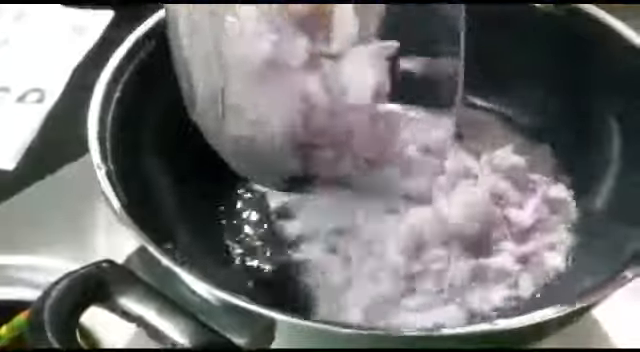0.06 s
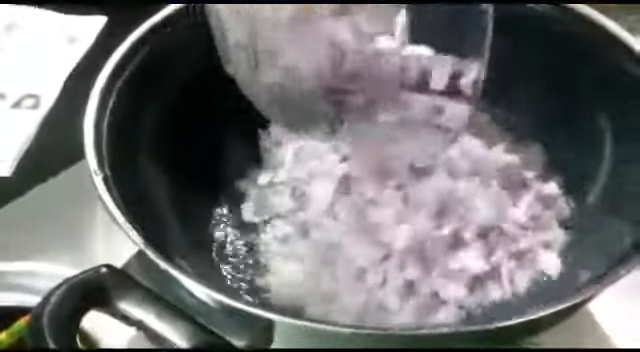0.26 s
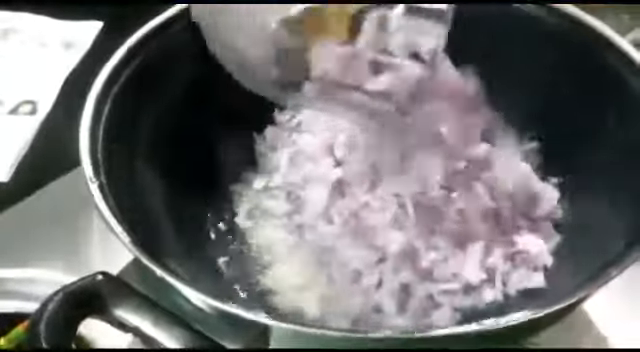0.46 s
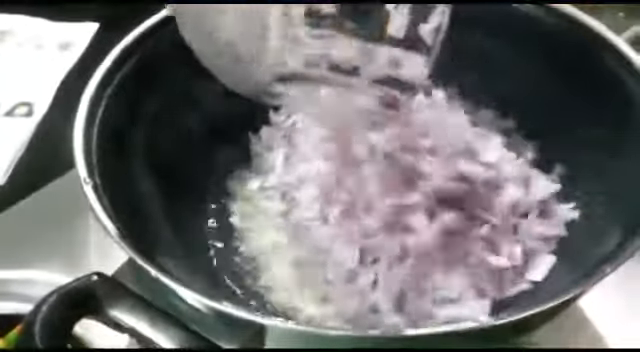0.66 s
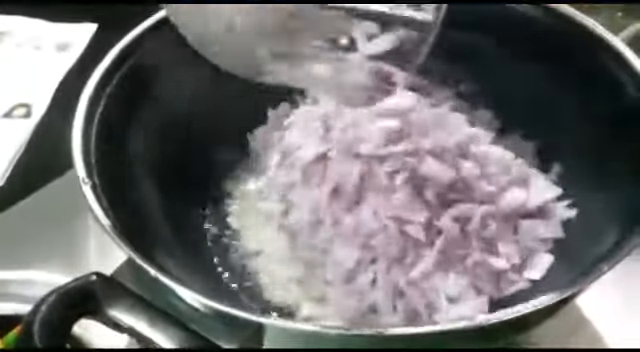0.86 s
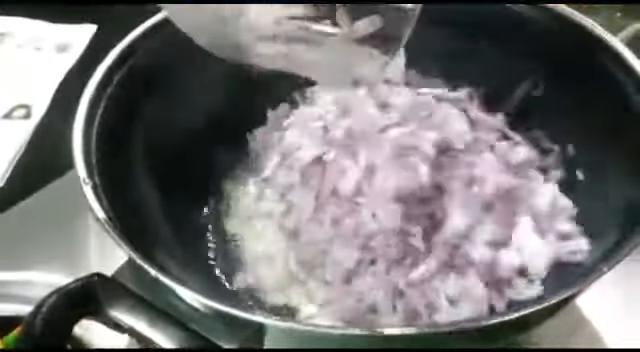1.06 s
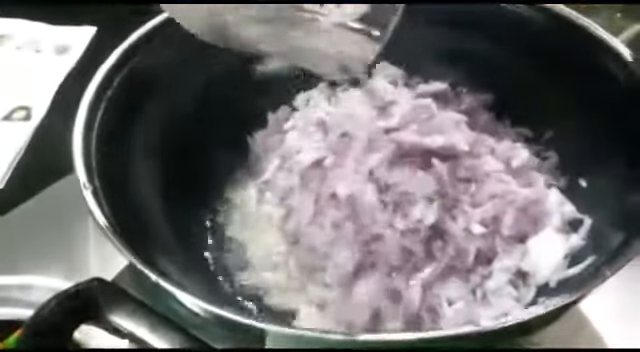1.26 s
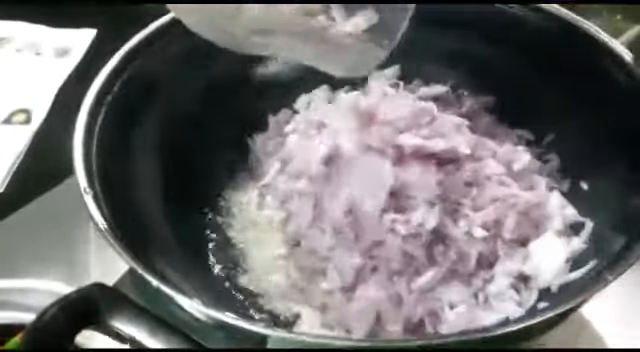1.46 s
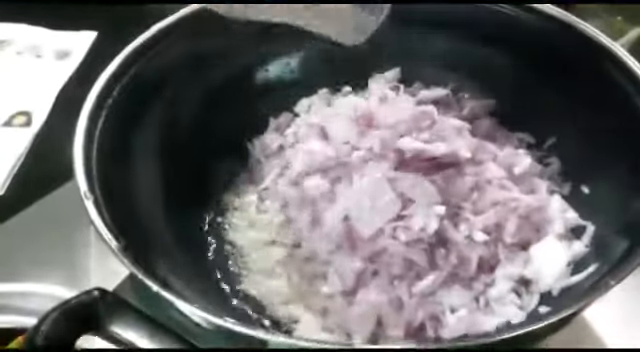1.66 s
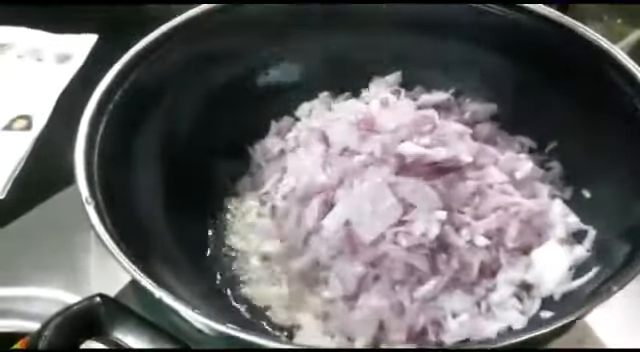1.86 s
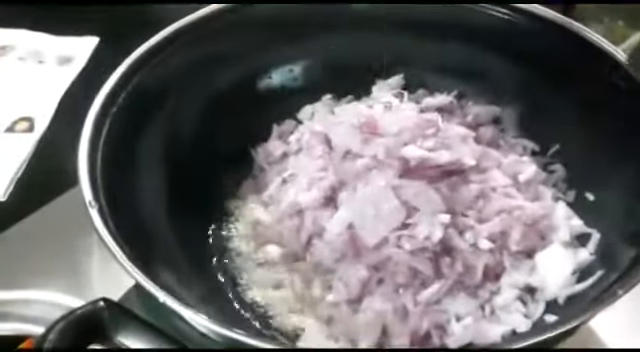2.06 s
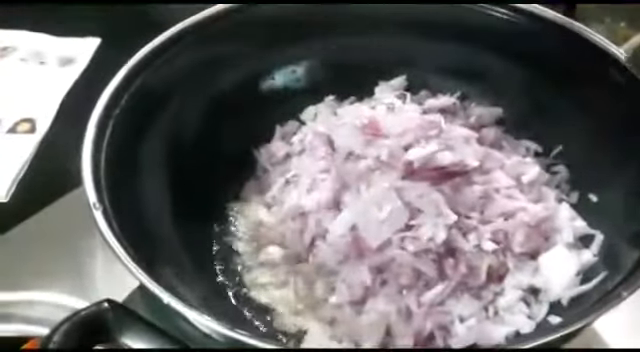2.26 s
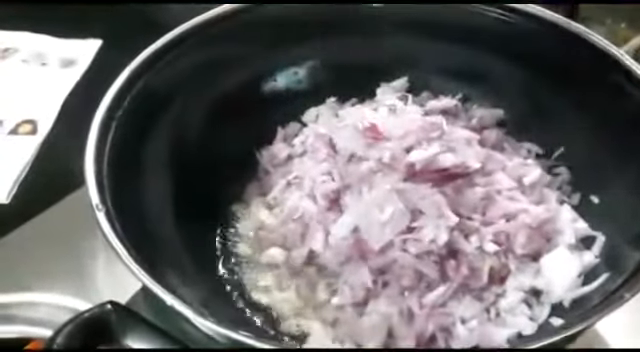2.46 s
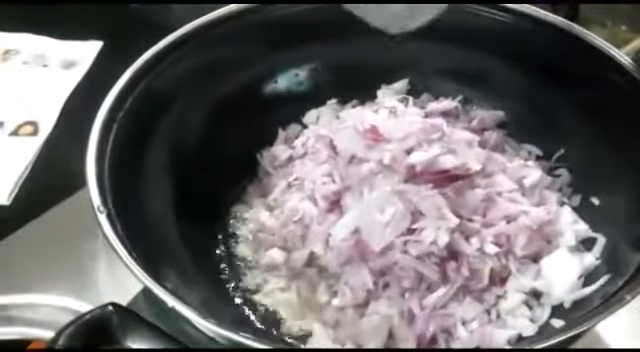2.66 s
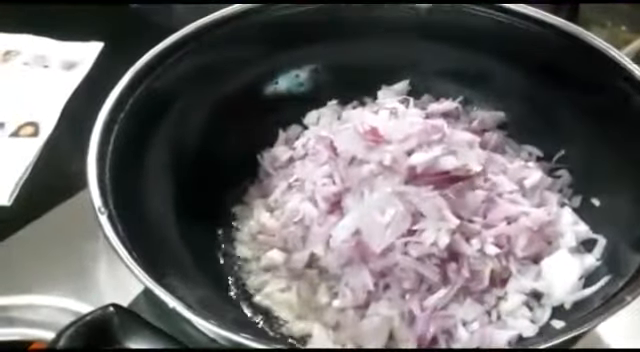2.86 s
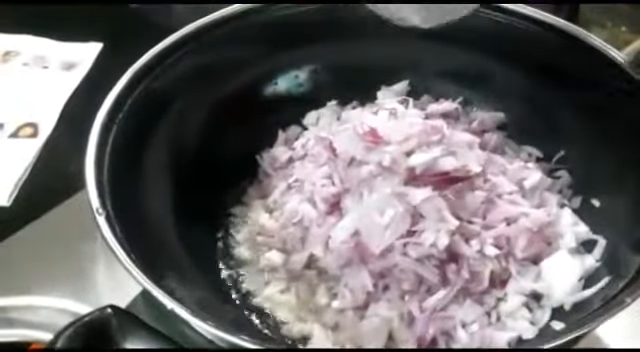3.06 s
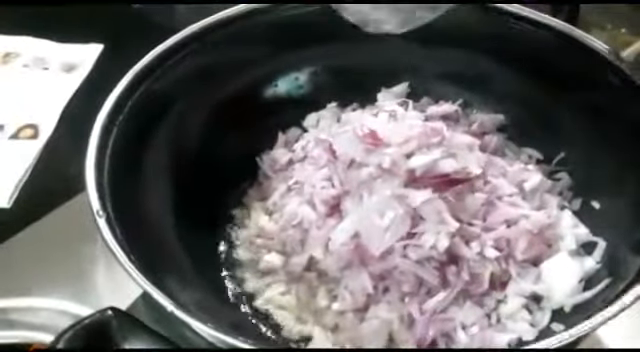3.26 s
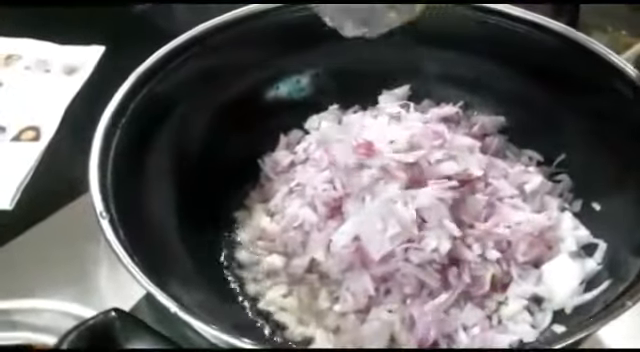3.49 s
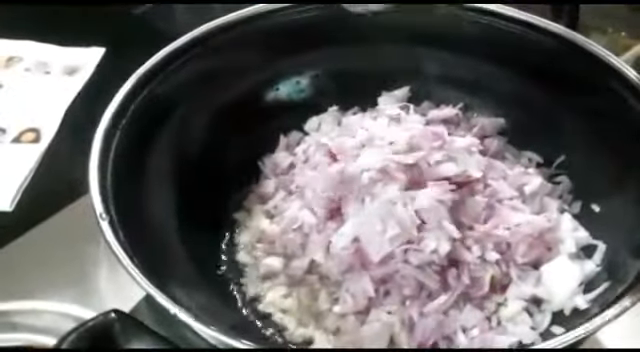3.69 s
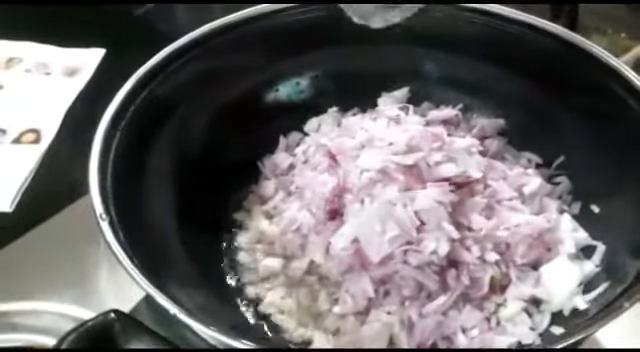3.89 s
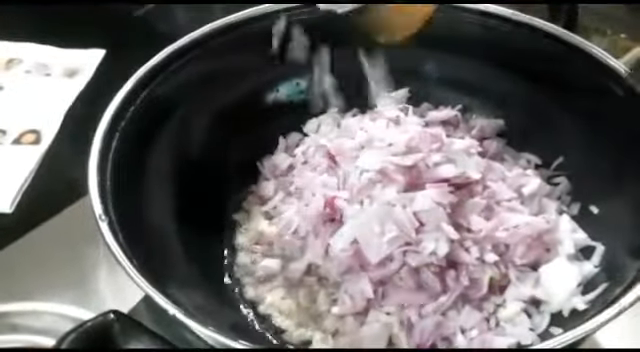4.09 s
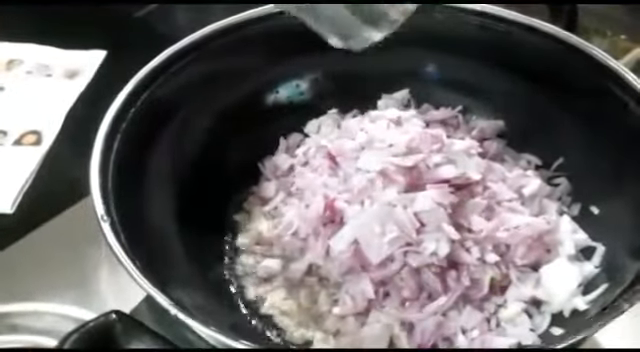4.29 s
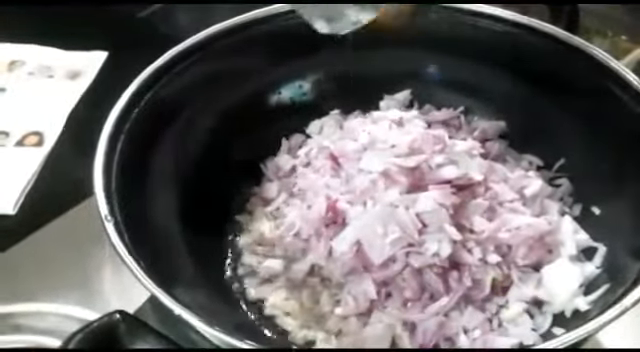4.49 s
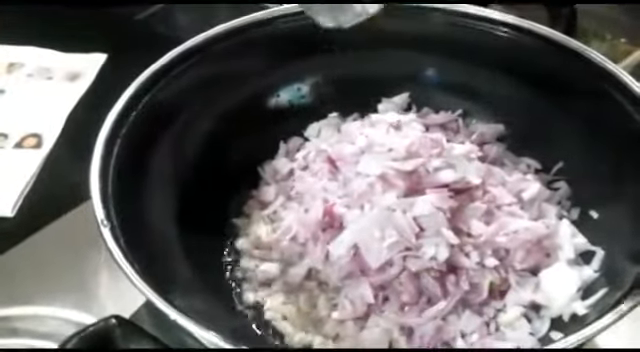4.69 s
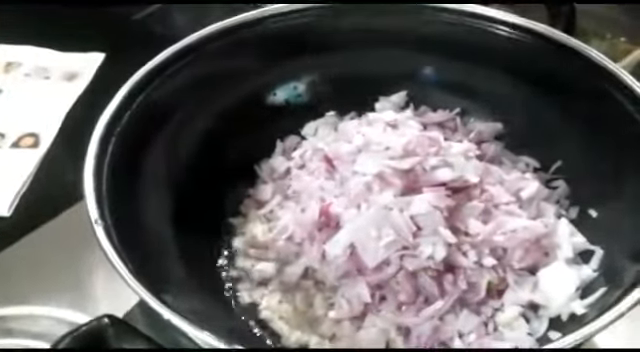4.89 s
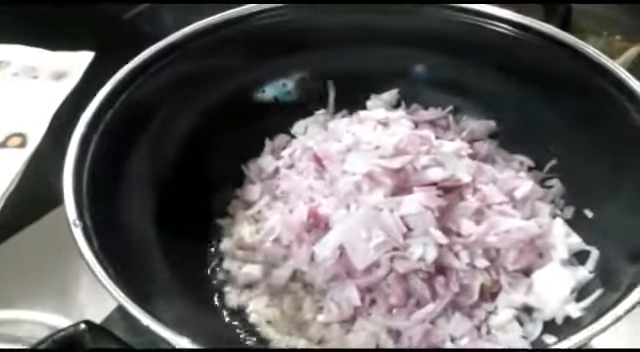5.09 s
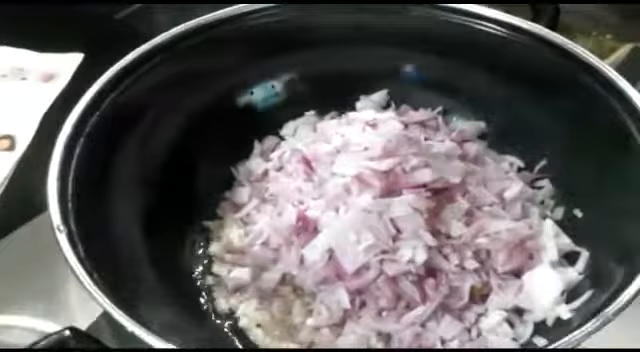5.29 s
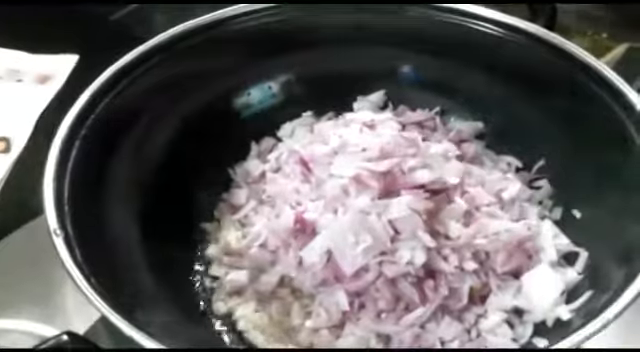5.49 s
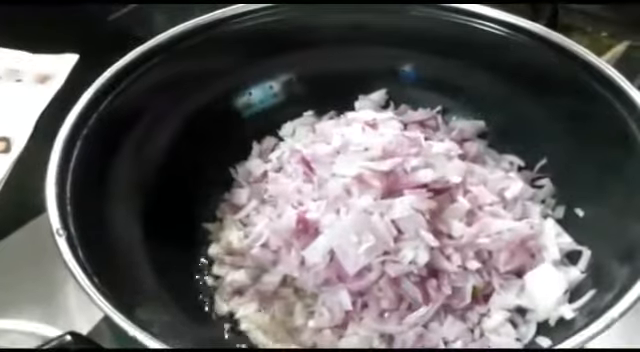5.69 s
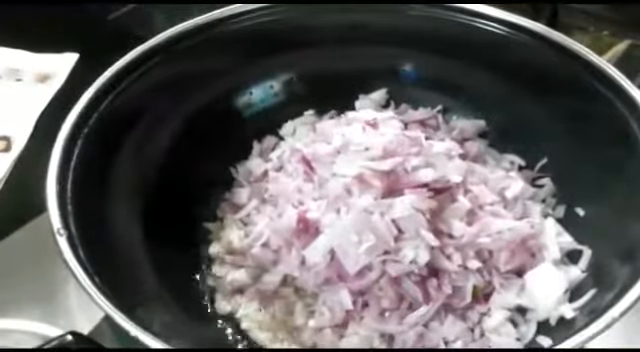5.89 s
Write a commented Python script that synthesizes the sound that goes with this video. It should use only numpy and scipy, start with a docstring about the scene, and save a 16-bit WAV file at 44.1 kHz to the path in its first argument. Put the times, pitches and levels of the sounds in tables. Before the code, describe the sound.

Chopped onion tumbles from a bowl into hot oil with an immediate loud burst of bright sizzling and dull bubbling. The rush settles within a second or so into steady frying that slowly weakens, with sharp pops, thin steam squeals and intermittent spoon knocks on the bowl, strongest near two and two and a half seconds. Close stereo pickup in a small, hard-walled kitchen.

```python
"""A loud rush of sizzling comes first, as chopped onion slides from a bowl into hot oil, close by in a kitchen.
Thousands of short clicks stand for bursting steam bubbles; they grow weaker as the oil cools.
Large bubbles pop as short, bright rings, and steam squeals out from under pieces as narrow, wavering noise.
A spoon knocks, clinks and scrapes on the bowl (decaying tones and noise), over a faint rumble and hum."""
import sys
import numpy as np
from scipy import signal
from scipy.io import wavfile
from scipy.ndimage import uniform_filter1d

SR = 44100
rng = np.random.default_rng(int(sys.argv[2]) if len(sys.argv) > 2 else 0)


def digitize_waveform(pressure):
    """Quantize a signal to 16-bit integers and store it at the path in sys.argv[1].

    Rows of a 2-D input are taken as channels; values are limited to [-1, 1].
    """
    field = np.atleast_2d(pressure).T
    bounded = np.clip(field, -1, 1)
    quanta = np.round(bounded * 32767).astype(np.int16)
    wavfile.write(sys.argv[1], SR, quanta)


N = 261895
T = np.arange(N) / SR  # the time of every sample, in seconds

# tone colour of the dull bubbling: frequency_hz, level_db
BUBBLING_COLOUR = [(40, -33), (100, -43), (170, -23), (280, -23), (350, -10), (500, -6.5), (800, -2),
                   (970, -4), (1120, 3), (1550, -3.5), (1780, -3.5), (2050, -8.5), (2400, 1.5)]
# tone colour of the bright sizzle and ticks: frequency_hz, level_db
SIZZLE_COLOUR = [(700, -27.5), (1150, -14.5), (1600, -18), (2080, -19), (2400, -7.5), (3200, -0.5),
                 (4500, 2.5), (4800, -3.5), (5700, -1.5), (5950, -5.5), (6900, -7.5), (7150, -12),
                 (8200, -9), (8700, -12), (12000, -20.5), (15500, -22.5)]
# when the frying flares up as pieces slip into fresh oil, or sinks as more onion covers it:
# middle_s, half_length_s, change_db
FLARES = [(.6, 0.39, 2), (0.893, 0.052, -5.5), (1.08, 0.065, 3), (1.36, 0.08, 0.5), (1.627, 0.05, -8.5),
          (3.067, 0.26, 3.5), (3.76, 0.057, 5.5), (4.21, 0.11, 4), (4.545, 0.063, 4), (5.84, 0.14, 4.5)]
# when the level of the frying dips briefly: start_s, change_db
DIPS = [(0.324, -4.5), (0.672, -3.5), (1.26, -5.5), (2.693, -3.5), (2.868, -6), (4.436, -3.5)]
# where the liveliest bubbling lies: time_s, left_over_right_db
BUBBLING_PLACE = [(0, 0.6), (1.35, 2), (2.05, -0.5), (2.5, 0.5), (3.4, 0.7), (4.1, -0.5), (4.3, 1),
                  (5.2, 1), (5.85, -0.5)]
# the largest bubbles bursting: start_s, level_db, pitch_hz, treble_snap_db, left_over_right_db
# (both levels are relative; pop() adds a fixed gain to each)
LARGE_POPS = [(0.196, -2, 3280, -22, 0.0), (0.616, -3, 4070, -26, -1), (1.0101, -1.5, 3900, -18, 0),
              (1.0986, -1, 5470, -29, 1), (1.671, -10, 5300, -49, -4), (2.029, -10, 4370, -29, -9),
              (2.375, -5.5, 4840, -33, -2), (2.6756, -7, 4520, -30, -4), (2.6898, -4.5, 5370, -26, 2),
              (2.8632, -11, 4300, -19, 0.5), (2.9107, -5.5, 4100, -27, 1.5), (2.9687, -4, 5150, -31, 2),
              (3.0857, -2, 4380, -16, 4), (3.1038, -8, 4560, -35, 2), (3.1619, -8.5, 4320, -37, -5),
              (3.919, -5, 3970, -33, 0), (4.101, -7.5, 3700, -30, 1), (4.2256, -6.5, 3100, -39, 5),
              (4.4333, -11, 3340, -33, 8), (4.5417, -10, 4070, -22, 11), (4.7699, -6.5, 3630, -28, 0),
              (5.0361, -11, 7820, -25, 2.5), (5.8504, -12.5, 3900, -13, -9)]
# steam squeezing out under a piece: start_s, length_s, pitch_hz, glide_octaves, level_db
STEAM_JETS = [(0, 0.79, 3216, -0.036, -29), (0.917, 0.35, 4020, 0.026, -29.5), (1.292, 0.6, 4820, 0, -31),
              (1.286, .5, 5350, 0.062, -26.5), (1.843, .35, 6720, 0.12, -29.5),
              (2.52, 0.2, 3160, -0.061, -35), (3.099, 0.31, 7860, 0.085, -36.5),
              (3.48, .19, 3460, 0.018, -32), (3.761, .21, 3580, .04, -31), (4.899, .38, 4740, -.16, -34),
              (5.249, .17, 3700, -0.047, -33.5), (5.332, 0.25, 4220, 0.0066, -34),
              (5.558, 0.15, 2370, .45, -38), (5.64, .24, 3205, 0, -32), (5.72, 0.26, 3850, 0, -32.5)]
# spoon on the bowl: start_s, level_db, pitch_hz, bowl_ring_db (relative to the knock, before a fixed cut)
SPOON_KNOCKS = [(0.799, -27.5, 895, -2.5), (1.210, -24.5, 696, -10.5), (1.329, -23, 795, -7),
                (1.538, -25.5, 780, -10), (1.868, -12, 835, -47), (2.298, -22.5, 856, -21),
                (2.591, -10, 915, -10.5), (2.901, -26.5, 880, -1), (3.002, -29, 600, -7),
                (3.018, -18.5, 913, -18), (3.265, -19.5, 960, -11.5), (3.696, -23, 814, -2.5),
                (4.012, -18, 907, -14.5), (4.727, -27.5, 790, -3), (4.824, -31, 870, -4)]
# the notes on which the bowl rings: pitch_hz, level_db, time_to_fall_60_db_s
BOWL_NOTES = [(804, 10.5, 0.13), (755, -6.5, 0.31), (1127, 4.5, 0.046), (1790, -52, .15)]
# the notes of the spoon clinking on the rim: pitch_hz, level_db, time_to_fall_60_db_s
CLINK_NOTES = [(770, -17.5, 0.03), (1870, -18.5, 0.037)]
# soft bumps through the stove: start_s, level_db, pitch_hz
STOVE_THUDS = [(1.49, -42, 80), (3.376, -32, 221)]
# tone colour of the kitchen's rumble: frequency_hz, level_db
RUMBLE_COLOUR = [(20, -4), (50, -4), (72, -4.5), (100, 0), (200, -3), (400, -11), (1500, -11), (6000, -47)]

RUSH_S = 0.62  # decay constant of the rush as wet onion lands
DIP_FALL_S, DIP_RECOVER_S = .003, 0.063
SMALL_POPS_PER_S, SMALL_POP_DB, SMALL_POP_SPREAD_DB = 7, -7.5, 3
SMALL_POP_COOL_DB_PER_S, SMALL_POP_SNAP_DB = 4.8, -26
SMALL_POP_HZ, SMALL_POP_SPREAD_OCTAVES = 4340, 0.38
JET_WIDTH_SHARE, JET_NARROW_S = 0.1, 6  # width as a share of the pitch, and decay constant of the width
JET_FADE_S, JET_SCATTER_DB = 0.029, -0.5
POUR_DB, POUR_FADE_DB_PER_S = -44, 24
CLINK_AT_S = 4.421
SCRAPE_AT_S, SCRAPE_HALF_S, SCRAPE_DB = 4.22, 0.22, -49
HUM_HZ, HUM_DB = 71, -75.5
EDGE_HZ = 15500  # the treble ends here


def sizzle():
    """Crackling bubbles over a haze of tiny ones; the finest fizz fades fastest as the oil cools."""
    crackle = bubbles(per_s=1400, size_db=1.5, clump_db=3.0, scatter_s=0.00045, scatter_db=2.5, largest=5.4)
    haze = bubbles(per_s=12000, size_db=2.5, clump_db=-0.94, scatter_s=0.0022, scatter_db=8.5)
    # tiny droplets spit
    spray = bubbles(per_s=440, size_db=0.5, clump_db=-10.0, scatter_s=0.00021, scatter_db=12, largest=11.0)
    bright_spray = unit(band(spray, 7300, "high", order=2))
    frying = unit(crackle) + amp(1.0) * unit(haze) + amp(-8.0) * bright_spray
    frying = shifting(colour(frying, SIZZLE_COLOUR))
    coarse = unit(band(band(frying, 5267, "low", order=6), 700, "high"))
    fine = unit(band(frying, 4615, "high", order=6))
    coarse_gain = frying_gain(db=-24.0, rush_db=7.5, cool_db_per_s=0.98, flare_share=1.0)
    fine_gain = frying_gain(db=-19.0, rush_db=1.6, cool_db_per_s=1.97, flare_share=0.25)
    return coarse * coarse_gain + fine * fine_gain


def shifting(x, patchy_db=2.0, span_s=.09, span_hz=330):
    """Gaps between the pieces open and close, so patches of pitch and time swell and fade at random."""
    window, hop = 256, 64
    spectrum = signal.stft(x, nperseg=window, noverlap=window - hop)[2]
    patches = rng.standard_normal(spectrum.shape[1:])
    patches = uniform_filter1d(patches, max(round(span_hz * window / SR), 1), 0)  # smooth along pitch
    patches = uniform_filter1d(patches, max(round(span_s * SR / hop), 1), 1)  # smooth along time
    patchy = spectrum * amp(patchy_db * unit(patches))
    return signal.istft(patchy, nperseg=window, noverlap=window - hop)[1][:, :N]


def frying_gain(db, rush_db, cool_db_per_s, flare_share):
    """Strength of one frying layer: the rush of landing, steady cooling, and the shared flare-ups."""
    flare_db = sum(size_db * np.exp(-((T - s) / half) ** 2) for s, half, size_db in FLARES)
    rush = rush_db * np.exp(-T / RUSH_S)
    return amp(db + rush - cool_db_per_s * T + flare_share * flare_db)


def dips_db():
    """The level dips briefly: a quick fall and a smooth return."""
    total = 0
    for s, db in DIPS:
        fall = np.clip((T - s) / DIP_FALL_S, 0, 1)
        total = total + db * fall * np.exp(-((T - s) / DIP_RECOVER_S) ** 2)
    return total


def bubbles(per_s, size_db, clump_db, scatter_s, scatter_db, largest=4.5, count=28):
    """Bubbles of random size burst in clumps at many spots of the pan, each spot with its own click."""
    clumps = unit(band(rng.standard_normal(N), 31.4, "low", order=1))
    size = amp(size_db * np.minimum(rng.exponential(1, N), largest) + clump_db * clumps)
    clicks = size * rng.choice([-1, 1], N) * (rng.random(N) < per_s / SR)
    spot = rng.integers(0, count, N)
    out = np.zeros((2, N))
    for k in range(count):
        clicks_here = (clicks * (spot == k))[None]
        out += signal.oaconvolve(clicks_here, burst(scatter_s, scatter_db), axes=1)[:, :N]
    return out


def burst(scatter_s, scatter_db, lag_s=.00007, spread_s=.00003, wall_hz=5000):
    """One click: the direct sound, usually sooner on the left, then treble scattered by the pan wall."""
    t = np.arange(512) / SR - .0004  # a little room ahead of the click
    lag = lag_s + spread_s * rng.standard_normal()
    direct = np.sinc((t - np.array([[0], [lag]])) * SR)
    fading_noise = rng.standard_normal((2, len(t))) * np.exp(-abs(t) / scatter_s) * (t > 0)
    wall = band(fading_noise, wall_hz, "high", order=1)
    return direct + amp(scatter_db) * wall / np.linalg.norm(wall, axis=1, keepdims=True)


def bubbling():
    """Larger, duller bubbles and wet pieces settling in the oil: clicks with the treble removed."""
    blips = bubbles(per_s=2500, size_db=3, clump_db=1.5, scatter_s=0.0006, scatter_db=7)
    dull = unit(band(colour(blips, BUBBLING_COLOUR), 2280, "low", order=6))
    return dull * frying_gain(db=-36.5, rush_db=12.0, cool_db_per_s=1.18, flare_share=0.13)


def ticks():
    """Bubbles on the near side of the pan burst as dry, separate ticks."""
    near = bubbles(per_s=130, size_db=3.5, clump_db=3.5, scatter_s=0.00022, scatter_db=-4,
                   largest=2.6, count=12)
    near = unit(band(colour(near, SIZZLE_COLOUR), 650, "high", order=2))
    return near * frying_gain(db=-30, rush_db=2, cool_db_per_s=1.03, flare_share=0.97)


def pops():
    """The largest bubbles, each bursting at its own moment."""
    out = np.zeros((2, N))
    for s, db, hz, treble_db, pan_db in LARGE_POPS:
        add(out, s, pop(db, hz, treble_db, pan_db))
    return out


def small_pops(pan_spread_db=3.5, count=100):
    """Lesser bubbles of random size and pitch burst at random, weaker as the oil cools."""
    out = np.zeros((2, N))
    times = np.cumsum(rng.exponential(1, count)) / SMALL_POPS_PER_S
    traits = np.clip(rng.standard_normal((count, 3)), -2, 2)
    for s, (size, pitch, side) in zip(times[times < T[-1]], traits):
        db = SMALL_POP_DB + SMALL_POP_SPREAD_DB * size - SMALL_POP_COOL_DB_PER_S * s
        hz = SMALL_POP_HZ * 2 ** (SMALL_POP_SPREAD_OCTAVES * pitch)
        add(out, s, pop(db, hz, db + SMALL_POP_SNAP_DB, pan_spread_db * side))
    return out


def pop(db, hz, treble_db, pan_db, ring_s=0.00054, ring_db=12, snap_db=15.5, crack=0.5):
    """A large bubble tears open with a bright snap and rings a few cycles; the pan wall scatters the ring."""
    t = np.arange(200) / SR
    puff = 1.14 * np.exp(-t / .00004)  # puff of steam
    ring = np.exp(-t / ring_s) * np.cos(2 * np.pi * hz * t) + puff
    click = burst(scatter_s=0.0016, scatter_db=6.5, lag_s=.00003, spread_s=.00001)
    body = signal.fftconvolve(click, ring[None], axes=1)
    body = band(band(body, 1800, "high", order=1) + crack * body, 530, "high", order=2)
    snap = burst(scatter_s=0.0012, scatter_db=23, lag_s=.00001, spread_s=.00001)
    snap = band(snap, 5600, "high", order=2)
    body = band(body, 8600, "low")[:, :snap.shape[1]]
    body = body / np.linalg.norm(body, axis=1, keepdims=True)
    snap = snap / np.linalg.norm(snap, axis=1, keepdims=True)
    sound = amp(db + ring_db) * body + amp(treble_db + snap_db) * snap
    return sound * amp(np.array([[1], [-1]]) * pan_db / 2)


def squeals(lag_s=.00006):
    """Steam jets sing in narrow, unsteady bands of noise that glide as the gap changes.

    Jets are broad while there is much steam and narrow as it runs out.
    """
    out = np.zeros((2, N))
    for start, length, hz, glide, db in STEAM_JETS:
        t = np.arange(max(round(length * SR), 64)) / SR
        width = hz * JET_WIDTH_SHARE * np.exp(-start / JET_NARROW_S)
        noise = rng.standard_normal((3, SR)) + 1j * rng.standard_normal((3, SR))
        flutter = band(noise, width / 2, "low", order=2)[:, -len(t):]
        # direct sound, and scatter from the pan wall
        flutter = flutter[0] + amp(JET_SCATTER_DB) * flutter[1:]
        turns = np.cumsum(hz * 2 ** (glide * t / length)) / SR - hz * np.array([[0], [lag_s]])
        jet = unit((flutter * np.exp(2j * np.pi * turns)).real)
        fade = np.clip(np.minimum(t, length - t) / JET_FADE_S, 0, 1)
        add(out, start, amp(db) * jet * fade)
    return out


def knocks(rise_s=0.00056, damp_s=0.0041, bend=0.53, bend_s=0.0008,
           overtone_hz=1870, overtone_db=-14, overtone_s=0.006,
           scrape_db=-13.0, scrape_s=0.009, lag_s=0.00011):
    """The spoon damps the bowl while it touches; when it bounces clear the bowl rings on."""
    out = np.zeros((2, N))
    # the bowl is nearer the left microphone
    t = np.maximum(np.arange(SR // 4) / SR - np.array([[0], [lag_s]]), 0)
    onset = 1 - np.exp(-t / rise_s)
    swell = onset ** 2 * np.exp(-t / damp_s)
    overtone = amp(overtone_db) * np.exp(-t / overtone_s) * np.sin(2 * np.pi * overtone_hz * t)
    for s, db, hz, ring_db in SPOON_KNOCKS:
        # the contact stiffens the wall, so the knock starts sharp
        bent_hz = hz * (1 + bend * np.exp(-t / bend_s)) * (t > 0)
        knock = swell / swell.max() * np.sin(2 * np.pi * np.cumsum(bent_hz, axis=1) / SR)
        grip = 1 + 0.0084 * rng.standard_normal()  # the hand detunes the bowl a little
        ring = sum(amp(note_db - 60 * t / t60) * np.sin(2 * np.pi * note_hz * grip * t)
                   for note_hz, note_db, t60 in BOWL_NOTES)
        rasp = unit(band(rng.standard_normal(t.shape[1]), [430, 1400], "band", order=2))
        rasp = amp(scrape_db) * rasp * np.exp(-t / scrape_s)
        add(out, s, amp(db) * (knock + onset * (overtone + rasp + amp(ring_db - 4) * ring)))
    return out * amp([[.8], [-.8]])  # slightly louder on the left


def clink(rise_s=0.00058):
    """A short, bright tap of the spoon on the rim, made of two fading notes."""
    out, t = np.zeros((2, N)), np.arange(SR // 10) / SR
    ring = sum(amp(db - 60 * t / t60) * np.sin(2 * np.pi * hz * t) for hz, db, t60 in CLINK_NOTES)
    add(out, CLINK_AT_S, band(ring * (1 - np.exp(-t / rise_s)), 450, "high", order=2))
    return out


def scrape(slips_per_s=400):
    """The spoon drags round the wet bowl in small, dull slips."""
    slips = rng.standard_normal(N) * (rng.random(N) < slips_per_s / SR)
    dull_slips = unit(band(slips, [280, 1300], "band", order=3))
    return dull_slips * amp(SCRAPE_DB) * np.exp(-((T - SCRAPE_AT_S) / SCRAPE_HALF_S) ** 2)


def pour():
    """Many soft pieces land in quick succession: a low patter that fades as the bowl empties."""
    landings = bubbles(per_s=500, size_db=-4.0, clump_db=-0.5, scatter_s=0.0018, scatter_db=0, count=6)
    patter = unit(band(band(landings, [190, 420], "band", order=1), 500, "low"))
    return patter * amp(POUR_DB - POUR_FADE_DB_PER_S * T)


def thuds(decay_s=0.0022):
    """Dull bumps through the stove: low tones that die almost at once."""
    out, t = np.zeros((2, N)), np.arange(SR // 10) / SR
    for s, db, hz in STOVE_THUDS:
        add(out, s, amp(db) * np.exp(-t / decay_s) * np.sin(2 * np.pi * hz * t))
    return out


def kitchen(x, t60=0.28, wet_db=-13):
    """Adds a short echo tail from the hard walls, different at each microphone."""
    t = np.arange(SR // 3) / SR
    tail = rng.standard_normal((2, len(t))) * amp(-60 * t / t60) * (t > .004)
    tail = tail / np.linalg.norm(tail[0])
    return x + amp(wet_db) * signal.oaconvolve(x, tail, axes=1)[:, :N]


def rumble():
    """The faint rumble of the room: steady noise, strongest in the bass."""
    return amp(-64.5) * unit(colour(rng.standard_normal((1, N)), RUMBLE_COLOUR))


def hum():
    """A faint motor in the kitchen: one steady low tone."""
    return amp(HUM_DB) * unit(np.sin(2 * np.pi * HUM_HZ * T))


def amp(db):
    """Turns decibels into a gain."""
    return 10 ** (np.asarray(db) / 20)


def unit(x):
    """Scales a sound to an average (rms) level of 1."""
    return x / np.sqrt(np.mean(x ** 2) + 1e-20)


def curve(rows, column):
    """Reads one column of a time table at every sample, with straight lines between the rows."""
    rows = np.asarray(rows)
    return np.interp(T, rows[:, 0], rows[:, column])


def add(mix, s, sound):
    """Mixes a sound in at time s."""
    part = mix[:, max(round(s * SR), 0):][:, :sound.shape[-1]]
    part += sound[..., :part.shape[1]]


def colour(x, points):
    """Shapes the tone through (frequency_hz, level_db) points, without any sound ahead of its cause."""
    hz, db = np.transpose(points)
    grid_hz = abs(np.fft.fftfreq(4096, 1 / SR))
    log_gain = np.log(amp(np.interp(np.log(grid_hz + 1), np.log(hz), db)))
    # the minimum-phase filter with these gains
    taps = np.fft.ifft(np.exp(np.conj(signal.hilbert(log_gain)))).real[:2048]
    return signal.oaconvolve(x, taps[None], axes=1)[:, :x.shape[1]]


def band(x, hz, kind, order=4):
    """Keeps the lows, the highs or a band between (Butterworth filter)."""
    return signal.sosfilt(signal.butter(order, hz, kind, fs=SR, output="sos"), x)


def scene():
    """The pan and the bowl in the kitchen, over a faint rumble and hum."""
    dull_bubbling = amp(-1.0) * kitchen(bubbling(), t60=0.14, wet_db=-6.5)
    pan = sizzle() + ticks() + squeals() + small_pops() + dull_bubbling
    left_right_db = np.array([[1], [-1]]) * curve(BUBBLING_PLACE, 1) / 2
    pan = pan * amp(dips_db() + left_right_db)
    echoing = kitchen(pour() + pops() + knocks() + clink() + scrape() + thuds())
    return pan + echoing + rumble() + hum()


def record(dry):
    """Cuts peaks off flat at 0.8, then removes the treble above the edge."""
    taps = signal.firwin(401, EDGE_HZ, window=("kaiser", 9), fs=SR)
    return signal.oaconvolve(np.clip(dry, -.8, .8), taps[None], "same", axes=1)


dry = scene()
out = record(dry)
digitize_waveform(out)
```